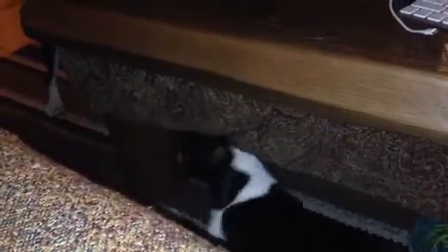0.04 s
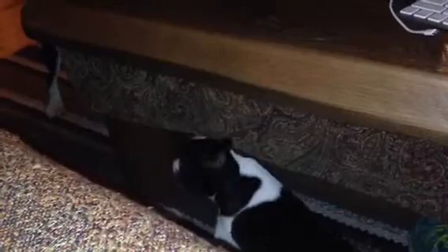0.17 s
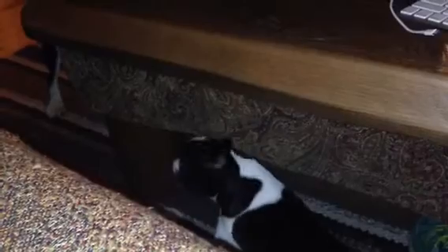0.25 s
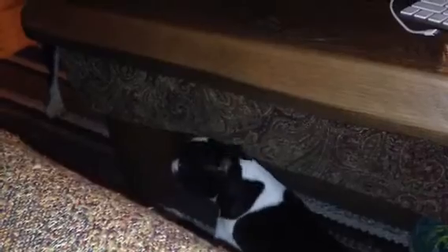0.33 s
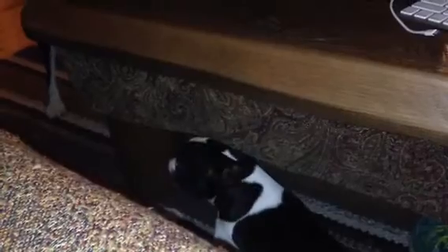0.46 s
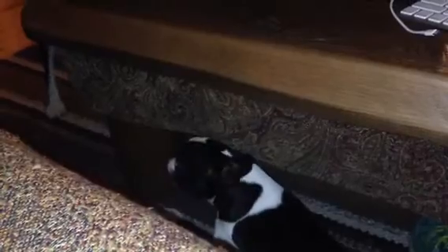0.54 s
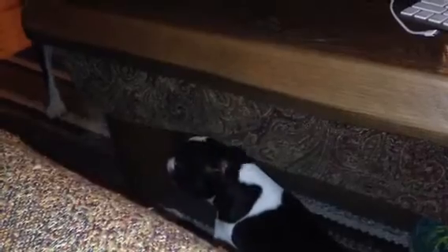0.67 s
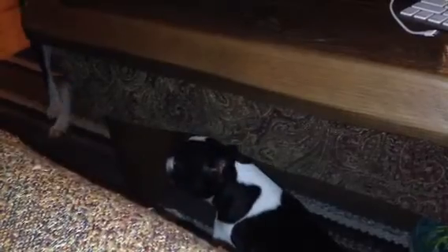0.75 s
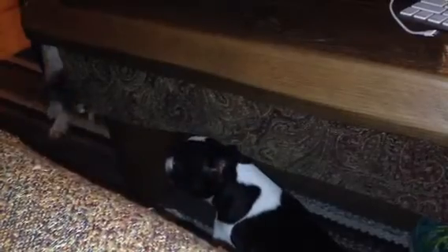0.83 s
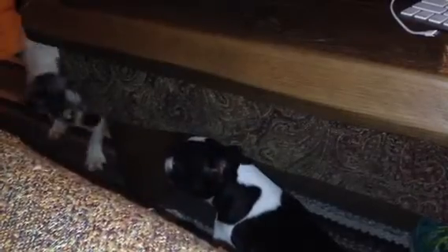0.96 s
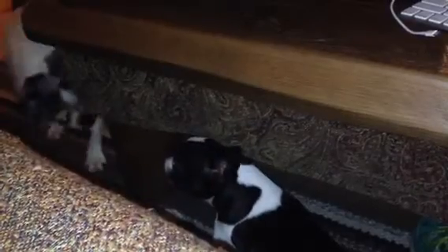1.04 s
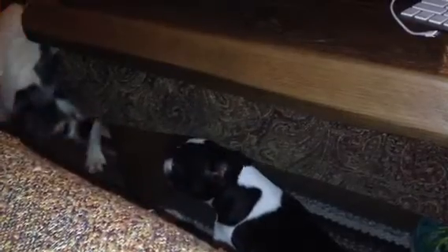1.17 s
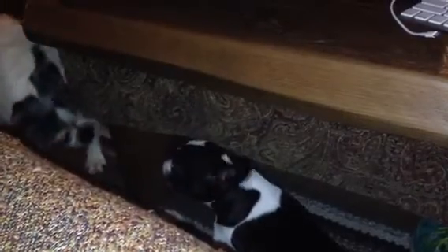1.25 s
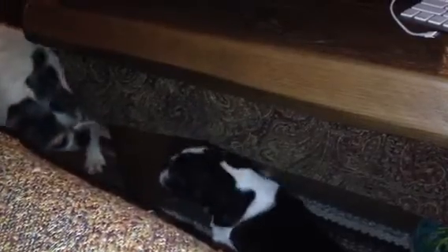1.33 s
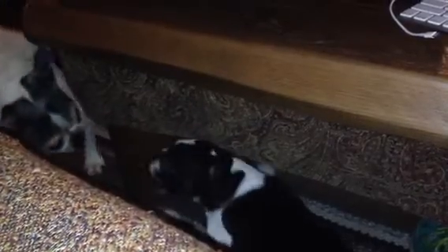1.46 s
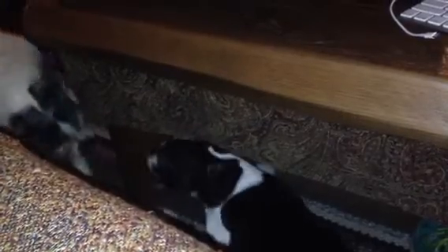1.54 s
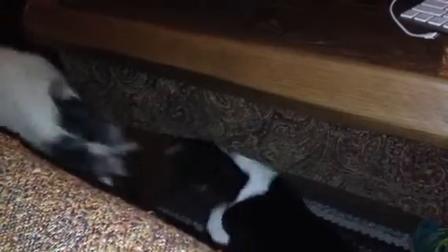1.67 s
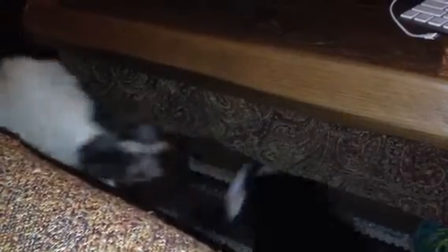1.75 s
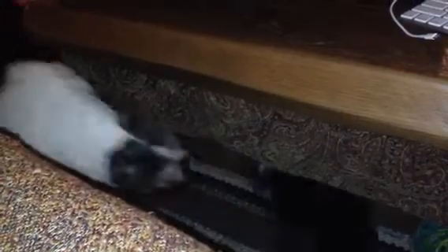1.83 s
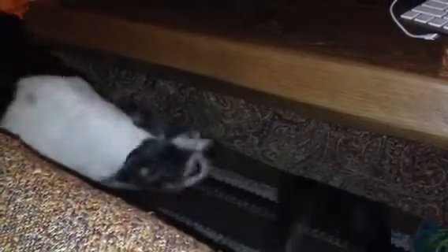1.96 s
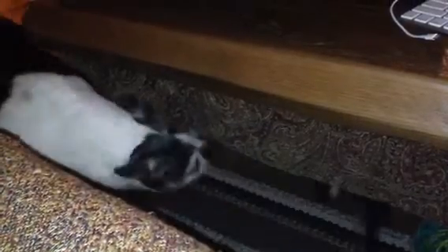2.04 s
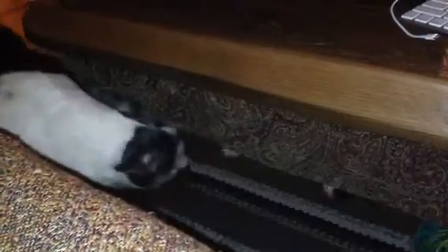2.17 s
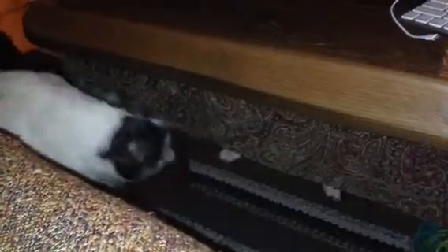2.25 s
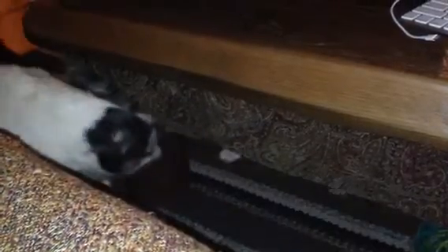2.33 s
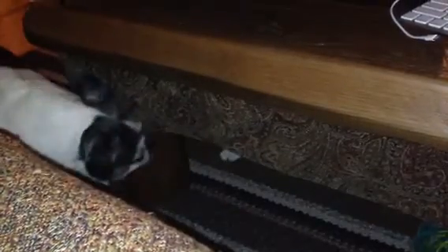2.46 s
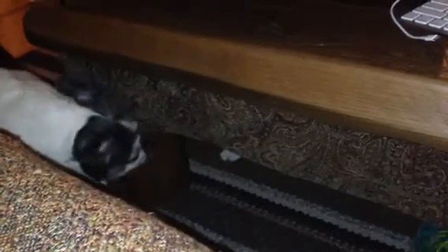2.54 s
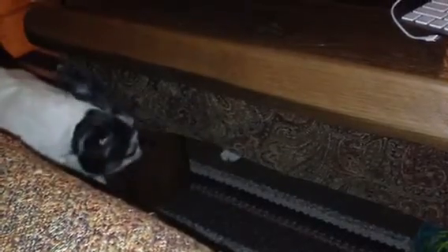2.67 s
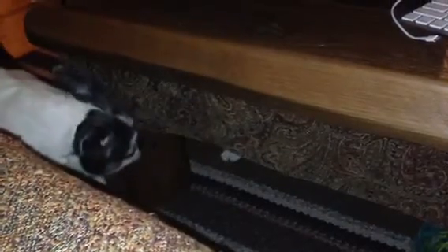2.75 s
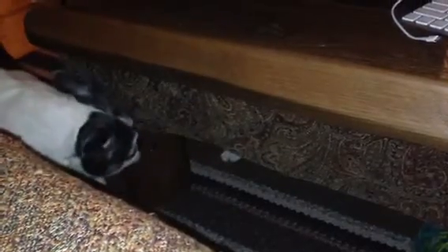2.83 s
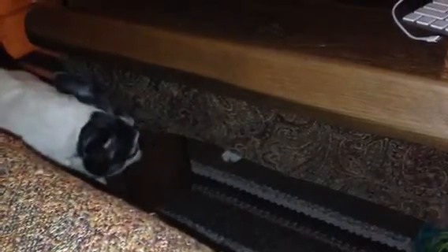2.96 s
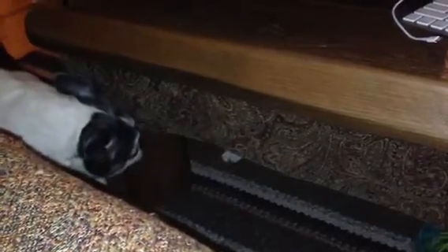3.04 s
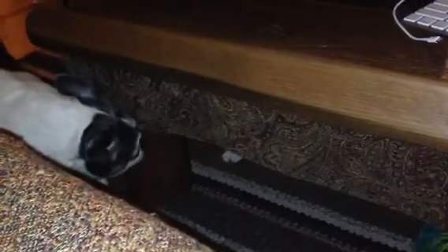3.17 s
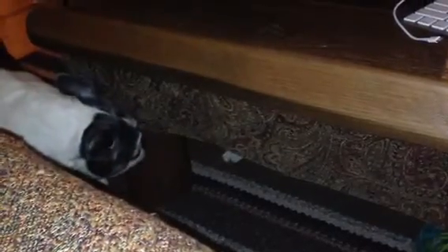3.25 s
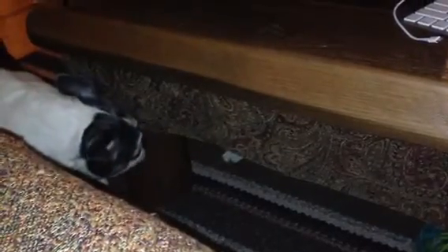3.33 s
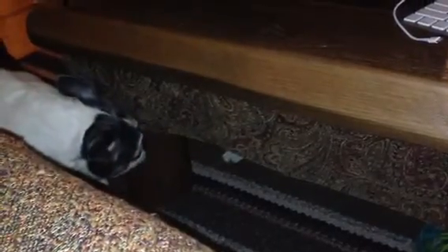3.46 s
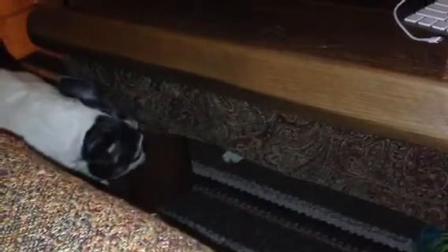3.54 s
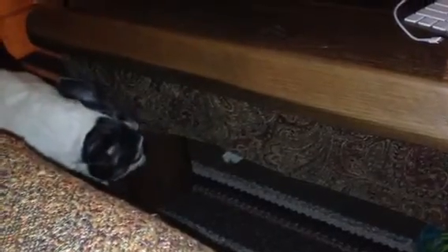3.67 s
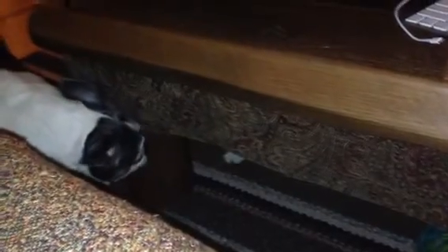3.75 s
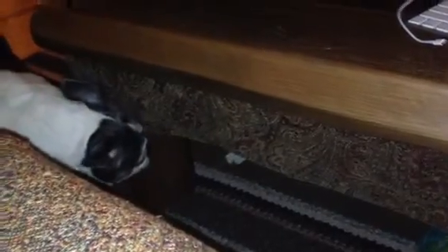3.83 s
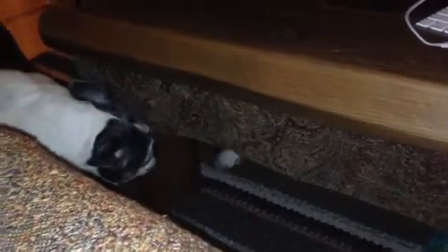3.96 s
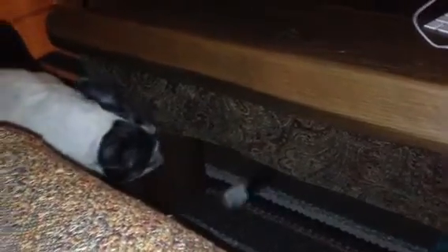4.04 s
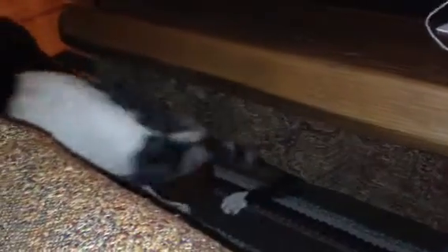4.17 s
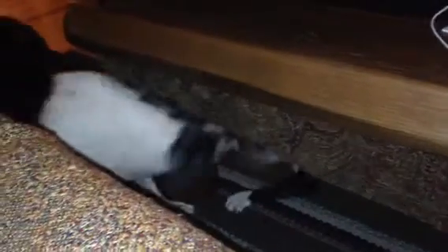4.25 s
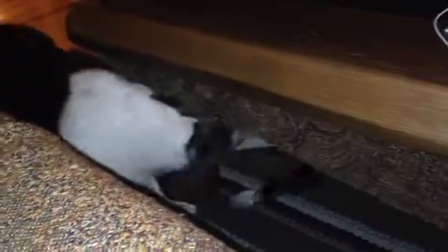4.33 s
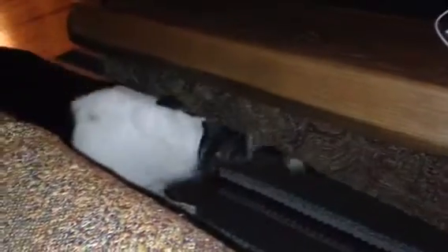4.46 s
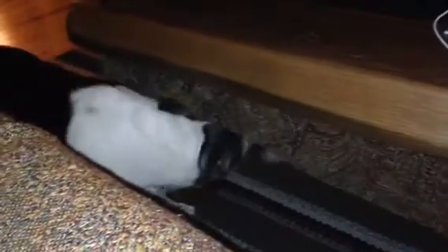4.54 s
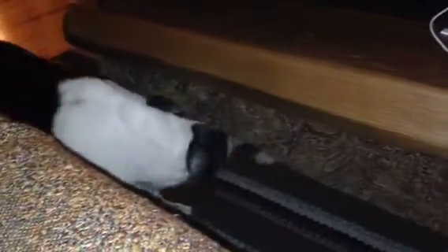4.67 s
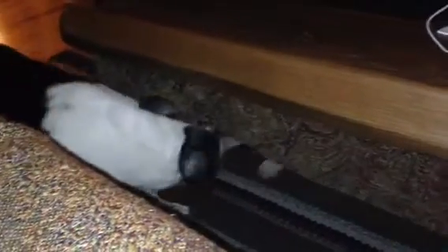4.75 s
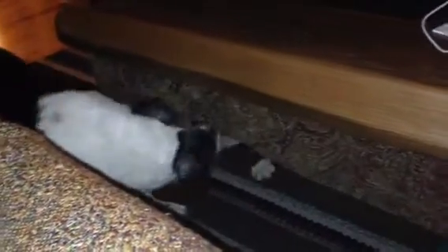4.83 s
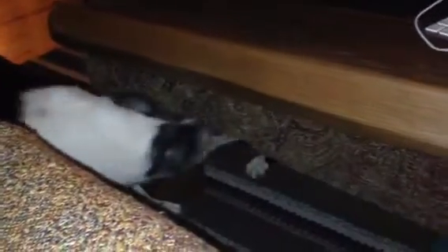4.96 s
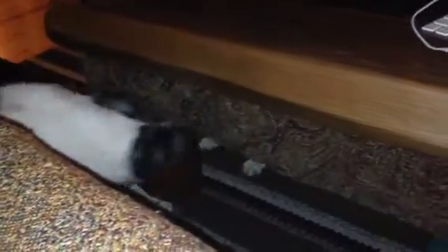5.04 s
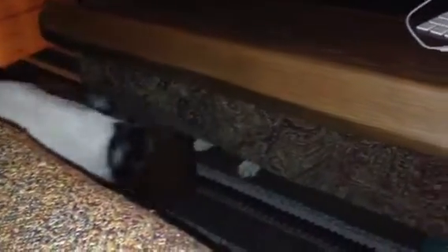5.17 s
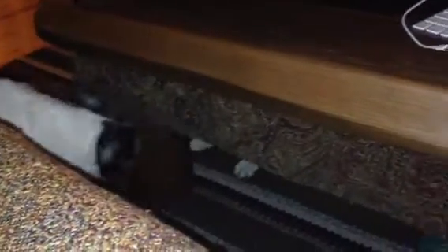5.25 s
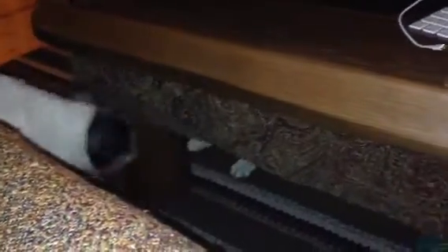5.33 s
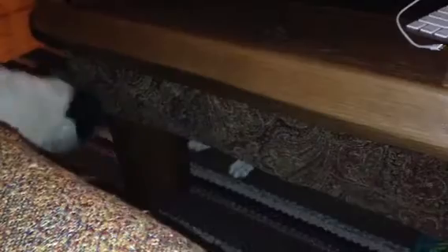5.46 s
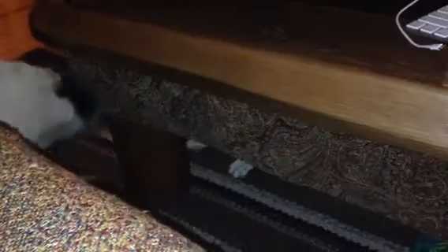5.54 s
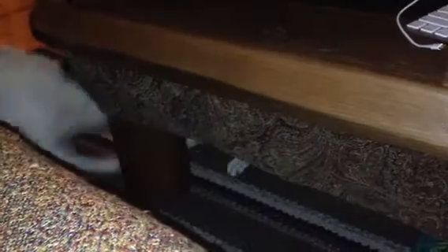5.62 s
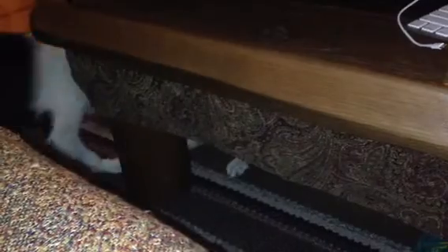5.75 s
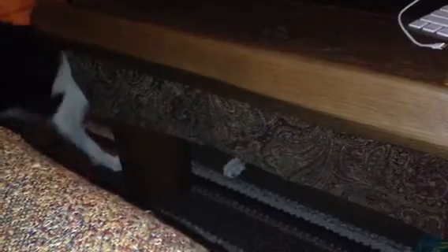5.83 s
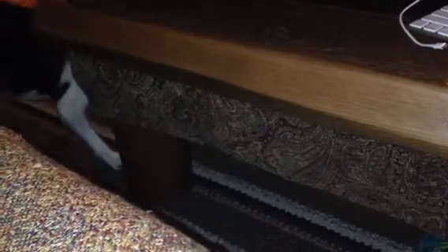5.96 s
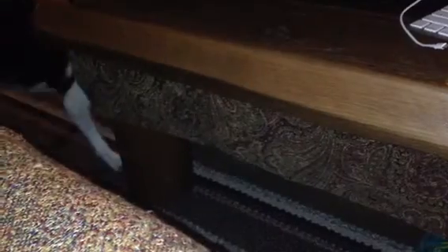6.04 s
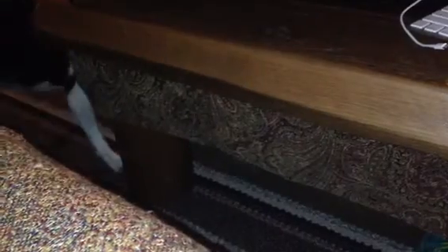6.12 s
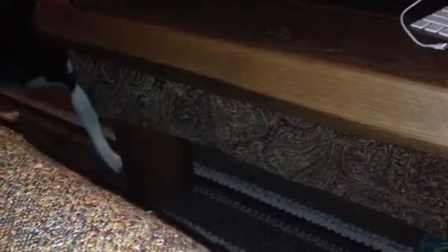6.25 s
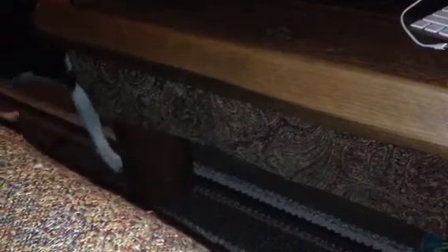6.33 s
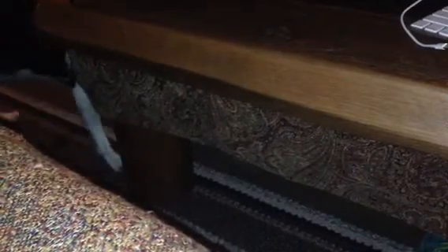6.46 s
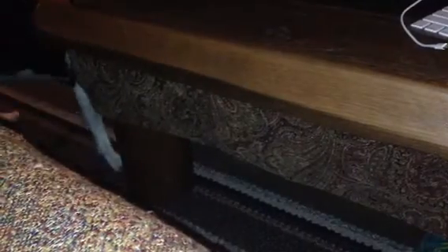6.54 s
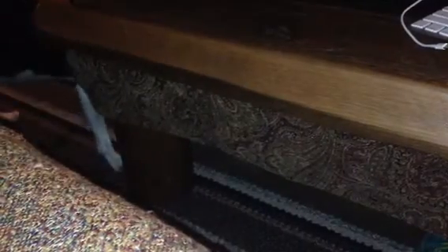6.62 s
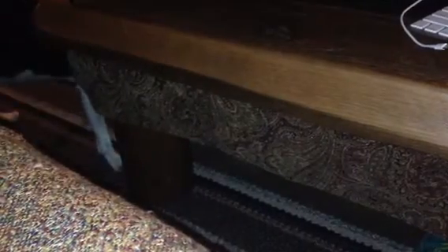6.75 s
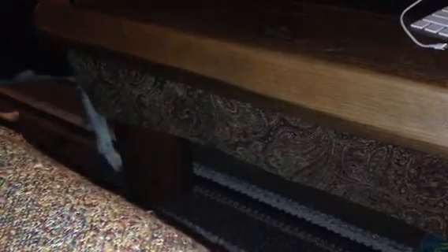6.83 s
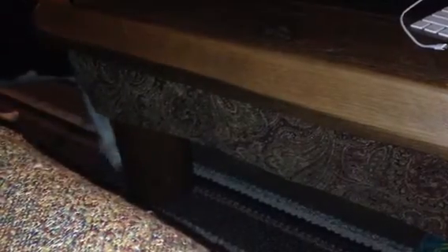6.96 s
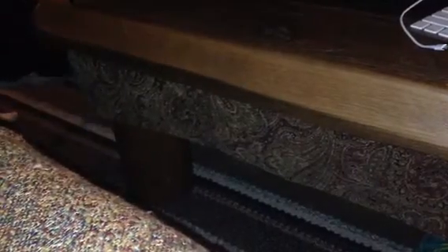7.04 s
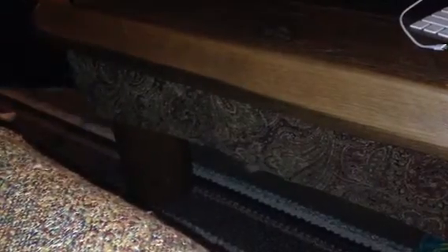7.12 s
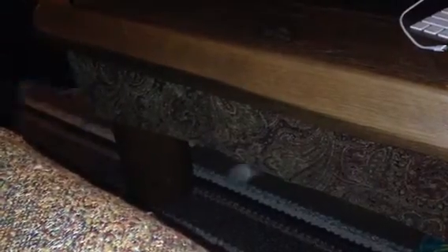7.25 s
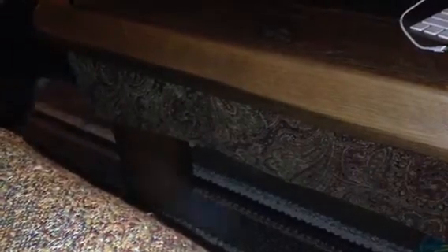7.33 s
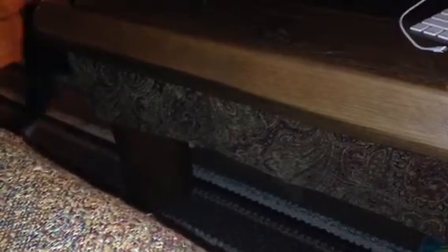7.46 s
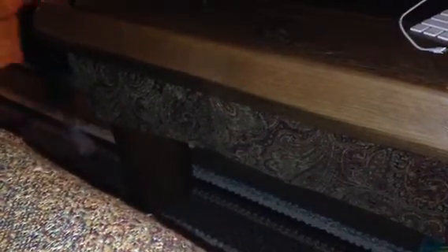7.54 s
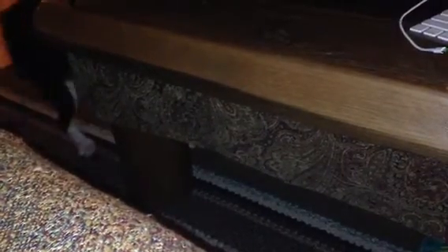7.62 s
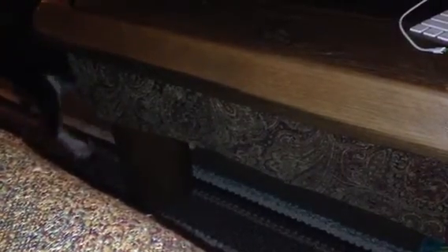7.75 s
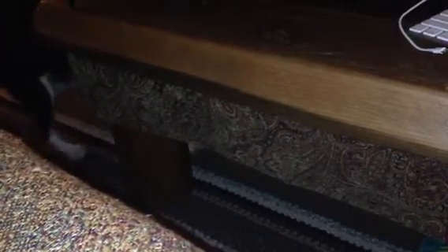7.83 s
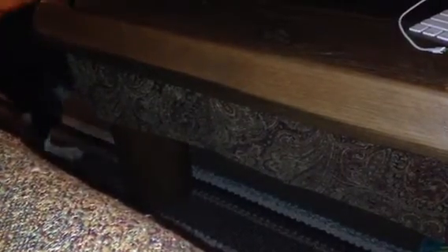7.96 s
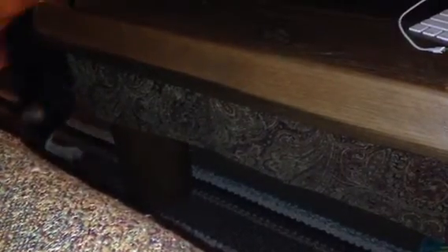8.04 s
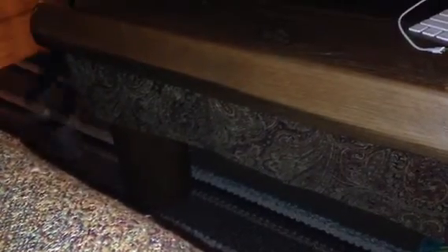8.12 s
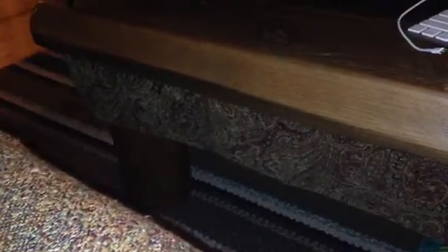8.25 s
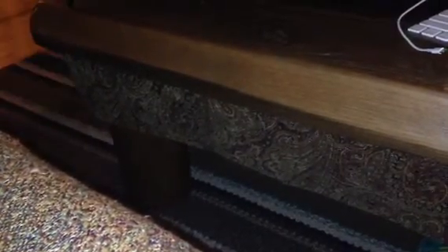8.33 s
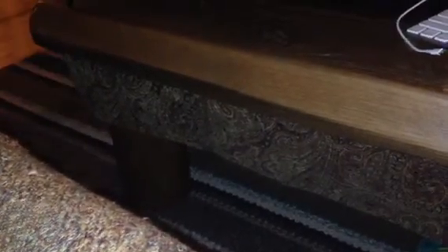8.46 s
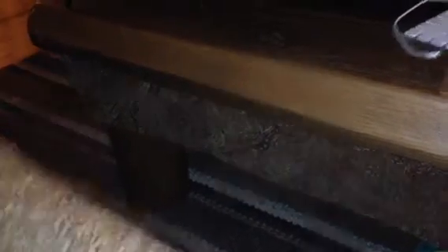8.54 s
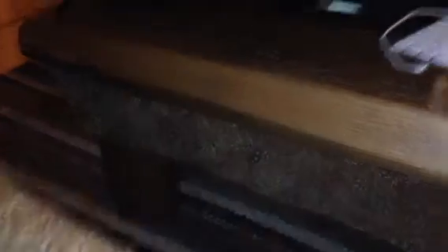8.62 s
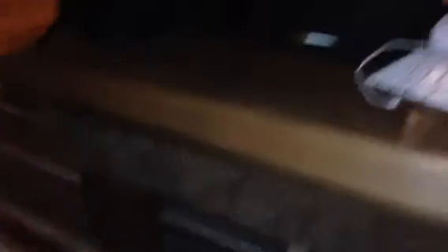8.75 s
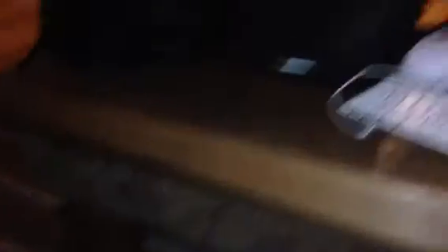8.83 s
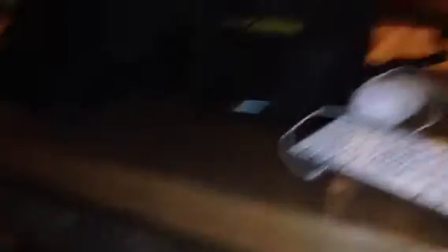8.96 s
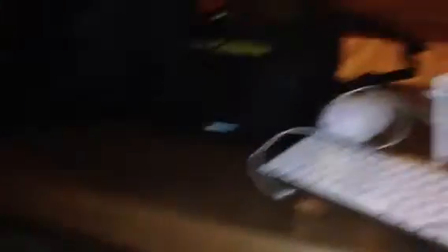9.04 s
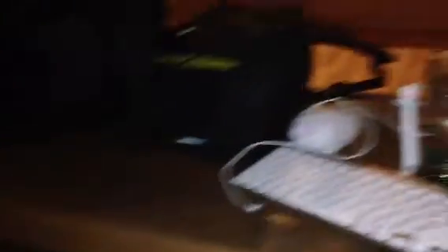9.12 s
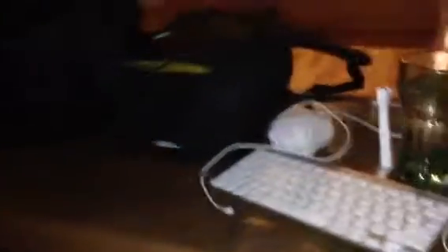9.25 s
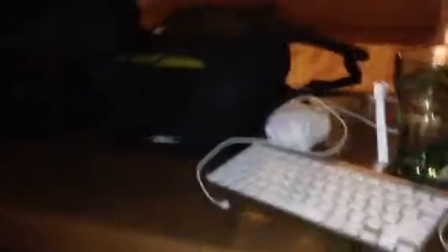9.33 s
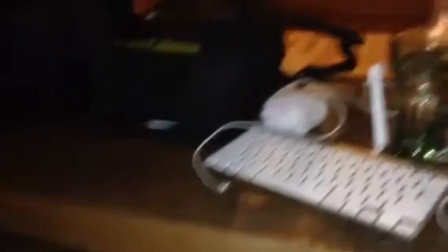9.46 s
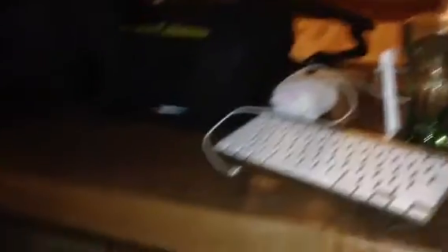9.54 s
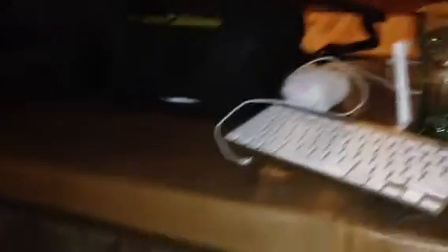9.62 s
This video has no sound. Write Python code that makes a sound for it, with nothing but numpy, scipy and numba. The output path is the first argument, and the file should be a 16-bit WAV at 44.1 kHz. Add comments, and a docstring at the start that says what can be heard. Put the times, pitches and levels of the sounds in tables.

```python
"""One small dog snarls in arches, most of which rise from a growl to a bark and sink back; another yaps sharply.
Each voice is a buzz of vocal-fold pulses and air, shaped by the chest, the moving jaw and the muzzle.
Shaped noise makes a snort, clicks of claws and teeth, knocking and thudding paws, rubbing fur and a soft growl.
The carpeted room adds echoes over a low rumble and faint hiss.
An automatic gain control turns everything down after loud barks and lets it creep back."""
import sys
import numpy as np
from scipy import signal
from scipy.fft import rfft, irfft, next_fast_len
from scipy.io import wavfile
from scipy.ndimage import uniform_filter1d, minimum_filter1d, map_coordinates
from numba import njit

SR = 44100
rng = np.random.default_rng(int(sys.argv[2]) if len(sys.argv) > 2 else 0)


def persist_wave(psi):
    """Save psi, clipped to +-1, as 16-bit WAV."""
    counts = np.round(np.clip(psi, -1, 1) * 32767).astype(np.int16)
    wavfile.write(sys.argv[1], SR, np.atleast_2d(counts).T)


N = 427329
TOP_HZ = 15600  # nothing sounds above this


def amp(db):
    """Turn decibels into a gain."""
    return 10 ** (np.asarray(db) / 20)


def unit(x):
    """Scale a sound to rms 1."""
    return x / np.sqrt(np.mean(x ** 2) + 1e-20)


def along(points, hz):
    """Read (frequency [Hz], value) points on a log frequency axis."""
    f, v = np.transpose(points)
    return np.interp(np.log(hz + 1), np.log(f + 1), v)


def curves(rows, t):
    """Read each column of a table at the times t, with straight lines between rows."""
    s, *columns = np.transpose(rows)
    return [np.interp(t, s, column) for column in columns]


def span(rows):
    """Give the sample times that a table covers, and a gate with soft edges."""
    edge = .004
    first = max(0, int((rows[0][0] - edge) * SR))
    last = int((rows[-1][0] + edge) * SR)
    t = np.arange(first, last) / SR
    to_edge = np.minimum(t - t[0], t[-1] - t)
    return t, np.sqrt(np.clip(to_edge / (2 * edge), 0, 1))


def add(track, s, x):
    """Mix x into the track at s seconds."""
    part = track[int(s * SR):][:len(x)]
    part += x[:len(part)]


def wobble(t, rate):
    """Draw a smooth random curve with this many random points a second."""
    knots = (t - t[0]) * rate
    return map_coordinates(rng.standard_normal(int(knots[-1]) + 4), [knots + 1])


def step(x):
    """Rise smoothly from 0 to 1 around x = 0."""
    return .5 + .5 * np.tanh(x)


def colour(x, spectrum):
    """Filter x to a (frequency [Hz], level [dB]) spectrum, with no sound ahead of its cause."""
    m = 2 * next_fast_len(len(x) // 2 + 4096)
    gain = amp(along(spectrum, np.fft.rfftfreq(m, 1 / SR)))
    # folding the cepstrum makes the filter causal (minimum phase)
    cepstrum = irfft(np.log(gain), m)
    cepstrum[1:m // 2] *= 2
    cepstrum[m // 2 + 1:] = 0
    return irfft(rfft(x, m) * np.exp(rfft(cepstrum)), m)[:len(x)]


def noise(t, spectrum):
    """Make coloured noise of rms 1."""
    return unit(colour(rng.standard_normal(len(t)), spectrum))


def steady(x):
    """Hold the slow level of x at rms 1."""
    power = uniform_filter1d(uniform_filter1d(x * x, size=700), size=700)
    return x / np.sqrt(np.abs(power) + 1e-14)


@njit
def resonate(x, hz, width, sr):
    """Ring like a hollow space whose pitch can move: a two-pole resonance."""
    y, r = np.zeros(len(x)), np.exp(-np.pi * width / sr)
    for i in range(2, len(x)):
        drive = (1 - r) * (x[i] - x[i - 2])
        y[i] = drive + 2 * r * np.cos(2 * np.pi * hz[i] / sr) * y[i - 1] - r * r * y[i - 2]
    return y


# how long the room rings in each pitch range: (frequency [Hz], time to fade by 60 dB [s])
ROOM_FADE = [(200, 0.44), (850, 0.64), (1200, 0.25805), (1600, 0.4513), (2400, 0.36), (4000, 0.4),
             (12000, 0.27)]


def room(x, early_db, tail_db):
    """Nearby furniture throws back quick copies; the walls add a short tail."""
    hz, t, grains = signal.stft(rng.standard_normal(SR // 2), SR, nperseg=256)
    fade = amp(-60 * t / along(ROOM_FADE, hz)[:, None])
    build_up = 1 - np.exp(-t / 0.0021)
    tail = signal.istft(grains * fade * build_up, SR, nperseg=256)[1]
    response = amp(tail_db) * tail / np.linalg.norm(tail)
    copies = (rng.uniform(.001, .018, size=14) * SR).astype(int)
    response[copies] += amp(early_db) * rng.choice([-1, 1], size=14)
    return x + signal.fftconvolve(x, response)[:N]


THROB_DB, THROB_PER_S = 4, 14  # size and rate of the rumble's quick chance swings
HISS_DB = -62  # level around which the hiss wavers
# slow loudness of the rumble, before its throb: (time [s], level [dB])
RUMBLE_LEVEL = [(0, -55.5), (.9, -46.5), (1.7, -47), (2.6, -44), (3.3, -45), (3.7, -44.5), (5.8, -45.5),
                (7.2, -42), (8.2, -44), (8.6, -42), (9.1, -42.5), (9.69, -37)]
# tone of the rumble: (frequency [Hz], relative level [dB])
RUMBLE_TONE = [(20, -32), (35, -23), (52, -18.5), (61, -4), (70, -4), (83, -5), (97, -11), (115, -12.5),
               (155, -22.5), (210, -32), (300, -34), (500, -89.5)]
# tone of the hiss: (frequency [Hz], relative level [dB])
HISS_TONE = [(110, -14), (200, -1), (330, -7.5), (450, -11), (1100, -14), (2200, -14.5), (3000, -18),
             (4000, -15), (7000, -23.5), (15500, -29.5)]


def background():
    """A throbbing low rumble and a faint, slightly uneven hiss, both of shaped noise."""
    t = np.arange(N) / SR
    rumble_db, = curves(RUMBLE_LEVEL, t)
    rumble = amp(rumble_db + THROB_DB * wobble(t, THROB_PER_S)) * noise(t, RUMBLE_TONE)
    hiss = amp(HISS_DB + 1.3 * wobble(t, 19)) * noise(t, HISS_TONE)
    return rumble + hiss


RUB_PEAK_SHARE = 0.24  # a stroke is strongest this far into its length
RUB_WIDTH_HZ = 1400  # width of the scuff's resonance
# rubbing fur and feet; the first stroke is the snort's breathy tail,
# and the one at 2.091 s is a short, soft growl, likely the other dog's:
# (time [s], length [s], scuff level [dB], scuff resonance [Hz], swish level [dB])
SOFT_STROKES = [(0.481, 0.29, -54, 1438, -59.5), (1.303, 0.08543, -52, 1391, -65),
                (1.37, 0.28402, -56.5, 1213, -51.5), (1.692, 0.11624, -41, 1318, -59.5),
                (2.091, .07, -35, 2101, -58.5), (2.358, 0.39, -50.5, 1250, -57),
                (2.549, 0.22, -44.5, 1842, -64.5), (6.383, 0.21, -59.5, 1096, -64),
                (6.92, .05, -46, 2349, -60.5), (8.468, 0.13, -49, 1579, -54.5),
                (8.618, 0.2, -49, 1791, -60), (8.86, 0.13, -60, 1400, -58), (9.07, 0.2, -52, 2100, -60),
                (9.431, 0.15915, -51, 1800, -53.5)]
# tone of a dull scuff, also heard under the paws: (frequency [Hz], relative level [dB])
SCUFF = [(250, -10.5), (550, -7), (800, -1), (1350, -5.5), (1800, -7.5), (2400, -6), (2900, -9.5),
         (3800, -10.5), (6000, -22.5)]
# tone of a bright swish, also the treble of the short knocks: (frequency [Hz], relative level [dB])
SWISH = [(2000, -22.5), (4300, 2), (5400, 3.5), (7300, -1.5), (8500, -3), (11000, -12.5), (13500, -11),
         (15500, -13.5)]


def soft_strokes():
    """Rubbing fur and feet, a breathy snort tail and a soft growl: uneven, grainy strokes of noise."""
    out = np.zeros(N)
    for s, length, scuff_db, scuff_hz, swish_db in SOFT_STROKES:
        t = np.arange(int(length * SR)) / SR
        stroke = np.interp(t / length, [0, RUB_PEAK_SHARE, 1], [0, 1, 0]) ** 2.1
        # in the rubs, fibres catch and slip
        grain = unit(amp(1.6 * wobble(t, 70) + 2.2 * wobble(t, 410)))
        centre_hz = np.full(len(t), float(scuff_hz))
        scuff = unit(resonate(grain * noise(t, SCUFF), centre_hz, RUB_WIDTH_HZ, SR))
        add(out, s, stroke * (amp(scuff_db) * scuff + amp(swish_db) * noise(t, SWISH)))
    return out


# paws landing, levels before a trim:
# (time [s], level [dB], scuff level against the thud [dB], time to fade by 60 dB [s])
PAWS = [(1.698, -37, 2, 0.1383), (2.459, -45.5, -11, 0.2114), (8.383, -38.5, -2, 0.085),
        (8.616, -23, -21, 0.10388), (8.723, -36.5, -19.5, 0.077), (8.872, -43.5, -1.5, 0.085)]
# tone of the thud: (frequency [Hz], relative level [dB])
PAW_TONE = [(59, -27), (100, -13.5), (172, 9), (329, 7.5), (517, -1.5), (634, -15.5), (1020, -8.5),
            (1220, -37), (1500, -42), (1950, -69.5), (3300, -120)]


def paws():
    """Paws thud: a quick push of low noise with some scuff, dying away."""
    out, t = np.zeros(N), np.arange(SR // 5) / SR
    for s, db, scuff_db, decay in PAWS:
        push = (1 - np.exp(-t / 0.00091)) * amp(db - 5.5 - 60 * t / decay)
        add(out, s, push * (noise(t, PAW_TONE) + amp(scuff_db + 1.0) * noise(t, SCUFF)))
    return out


# claws, teeth, dull paw knocks (1.249 and 1.38 s) and the snort's sharp onset (0.309 s),
# levels before a trim:
# (time [s], level [dB], treble level against the body [dB], time to fade by 60 dB [s])
SHORT_KNOCKS = [(0.309, -44, -18, 0.0343), (0.595, -37, -9, 0.02098), (1.249, -42, -26.5, 0.07916),
                (1.38, -37, -18, 0.0761), (1.405, -43.5, -11, 0.049), (1.462, -41.5, -6, 0.0249),
                (1.494, -46.5, -7.5, 0.04805), (1.789, -16, -20, 0.01304), (2.363, -38, -29, 0.048),
                (2.526, -35.5, -21.5, 0.03617), (2.62, -44.5, -26.5, 0.0432), (2.684, -37.5, -15, 0.0398)]
# tone of the body of these sounds: (frequency [Hz], relative level [dB])
KNOCK_TONE = [(240, -56.5), (400, -15.5), (673, -14.5), (1420, 0.5), (2350, -5), (3070, -36.5),
              (3510, -16.5), (5570, -34.5), (6560, -18.5), (14000, -54.5)]


def short_knocks():
    """Claws, teeth, dull paw knocks and the snort's onset: noise that starts at once and dies quickly."""
    out, t = np.zeros(N), np.arange(SR // 5) / SR
    for s, db, treble_db, decay in SHORT_KNOCKS:
        fade = amp(db - 4.5 - 60 * t / decay)
        add(out, s, fade * (noise(t, KNOCK_TONE) + amp(treble_db + 2.5) * noise(t, SWISH)))
    return out


# course of the snort, levels before a trim:
# (time [s], flutter level [dB], air level [dB], nose resonance [Hz])
SNORT = [(0.324, -35, -68.5, 520), (0.345, -37.5, -44.5, 600), (0.372, -29, -39.5, 849),
         (0.394, -39.5, -26, 1346), (0.418, -33, -35, 1942), (0.44, -47, -32, 1779),
         (0.465, -51, -40.5, 1312), (0.5, -75.5, -54.5, 1203)]
# tone of the lip flutter: (frequency [Hz], relative level [dB])
SNORT_LOW = [(80, -12.5), (140, 3), (240, -9.5), (340, -2.5), (440, -18), (600, -4.5), (800, -28.5),
             (1200, -22.5), (2200, -61.5)]
# tone of the air before the nose: (frequency [Hz], relative level [dB])
SNORT_AIR = [(300, -3.5), (600, 6), (950, 9), (1400, -5), (1800, -5.5), (2450, -1.5), (2700, -15.5),
             (3600, -9), (7000, -3), (12500, -6), (15000, -22)]


def snort():
    """A dog huffs: its lips flutter, then air bursts through a nose resonance that rises and sinks."""
    t, gate = span(SNORT)
    flutter_db, air_db, nose_hz = curves(SNORT, t)
    air = steady(resonate(noise(t, SNORT_AIR), nose_hz, 765.2, SR))
    flutter = steady(noise(t, SNORT_LOW))
    huff = amp(flutter_db - 1.5) * flutter + amp(air_db - 5.0) * air
    roughness = unit(amp(1.934 * wobble(t, 262.5)))
    out = np.zeros(N)
    add(out, t[0], gate * huff * roughness)
    return out


def larynx(t, pitch, rough, jitter, shimmer_db):
    """Pulses of the vocal folds, unsteady when rough, and the air that each opening lets through."""
    # slack folds at growl pitch keep time less well
    slack = np.sqrt(500 / pitch)
    quaver = .022 * slack * wobble(t, 70) + jitter * slack * (.15 + rough) * wobble(t, 330)
    phase = 2 * np.pi * np.cumsum(pitch * (1 + quaver)) / SR
    k = np.arange(1, 48)[:, None]  # harmonic numbers
    # the folds close gradually, which spreads each pulse
    harmonics = np.cos(k * phase + .3 * k ** 2) * (k * pitch < TOP_HZ)
    pulses = unit(np.sum(harmonics, axis=0))
    # strained folds slip in and out of patterns of two and three cycles
    halves, thirds = np.cos(phase / 2), np.cos(phase / 3 + wobble(t, 40))
    pattern = 1 + rough * (1.3 * wobble(t, 45) * halves + 1.2 * wobble(t, 45) * thirds)
    air = unit(rng.standard_normal(len(t)) * (1 + 0.96 * np.cos(phase)))
    rattle = amp(shimmer_db * rough * slack * wobble(t, 190))
    return steady(pulses * pattern) * rattle, air * rattle


JAW_WANDER, JAW_WANDER_PER_S = 0.051, 38  # chance movement of the resonances: share, rate
PART_FLUTTER_DB, PART_FLUTTER_PER_S = 1.8426, 110  # wavering of second resonance and rasp, each its own
# range of the first resonance, alike in both dogs: (frequency [Hz], relative level [dB])
MOUTH = [(400, -72), (650, -21.5), (800, -3), (1000, 0), (1480, -0.5), (1700, 0), (2100, -19),
         (3200, -58.5)]
# range of the second resonance, alike in both dogs: (frequency [Hz], relative level [dB])
SECOND = [(1200, -55.5), (1650, 4), (1900, 3.5), (2150, -2.5), (2400, 1.5), (2650, -4.5), (2950, -14),
          (3800, -49.5)]


def dog(calls, chest_tone, rasp_tone, jitter, shimmer_db, first_width_hz, second_width_hz,
        third_width_hz, chest_air, rasp_air, mouth_db, chest_db, second_db, rasp_db):
    """Pulses and air sound through the chest and three mouth resonances; the chest carries least air."""
    out = np.zeros(N)
    for t, gate, pitch, rough, resonances, (first, second, rasp, chest) in calls:
        first_hz, second_hz, third_hz = [
            hz * (1 + JAW_WANDER * wobble(t, JAW_WANDER_PER_S)) for hz in resonances]
        rough = np.clip(rough, .01, .95)
        pulses, air = larynx(t, pitch, rough, jitter, shimmer_db)

        def source(airiness):
            """Mix pulses and air: the rougher the voice, the more air."""
            return np.sqrt(1 - rough) * pulses + airiness * np.sqrt(rough) * air

        def flutter():
            """Waver in level [dB]."""
            return PART_FLUTTER_DB * wobble(t, PART_FLUTTER_PER_S)

        chest_part = steady(colour(source(chest_air), chest_tone))
        first_part = steady(colour(resonate(source(1.0), first_hz, first_width_hz, SR), MOUTH))
        second_part = steady(colour(resonate(source(1.0), second_hz, second_width_hz, SR), SECOND))
        # the third resonance is only a bump on the muzzle's broad rasp
        breath = source(rasp_air)
        muzzle = breath + 1.9 * resonate(breath, third_hz, third_width_hz, SR)
        rasp_part = steady(colour(muzzle, rasp_tone))

        voice = amp(chest + chest_db) * chest_part
        voice += amp(first + mouth_db) * first_part
        voice += amp(second + second_db + flutter()) * second_part
        voice += amp(rasp + rasp_db + flutter()) * rasp_part
        add(out, t[0], gate * voice)
    return out


# depth of the attack; speed and length of the release
YAP_RISE_DB, YAP_RELEASE_DB_PER_S, YAP_RELEASE_S = 32, 298.5, 0.069
YAP_REST_SHARE, YAP_CREST_S = .73, .027  # pitch far from the crest over crest pitch; crest half width
YAP_TEAR, YAP_TEAR_S = 0.33894, 0.0046  # roughness gained as the voice breaks; how quickly
# the jaw's closed resonance; it closes this long after the crest, and this quickly
JAW_SHUT_HZ, JAW_LAG_S, JAW_CLOSE_S = 993.3, .032, 0.034
YAP_CHEST_SAG_DB_PER_S = 110  # the chest fades through the hold


def yap(start, attack, hold, crest, crest_hz, clear_rough, open_hz, first_db, sag,
        second_hz, second_db, third_hz, rasp_db, chest_db):
    """Attack, hold, release: the pitch flicks up, then the voice tears and the jaw closes."""
    age = np.arange(int((attack + hold + YAP_RELEASE_S) * SR)) / SR
    held, past_crest = np.maximum(0, age - attack), age - crest
    attack_db = -YAP_RISE_DB * np.maximum(0, 1 - age / attack)
    release_db = -YAP_RELEASE_DB_PER_S * np.maximum(0, held - hold)
    gate = amp(attack_db + release_db)
    flick = np.exp(-(past_crest / YAP_CREST_S) ** 2)
    pitch = crest_hz * (YAP_REST_SHARE + (1 - YAP_REST_SHARE) * flick)
    rough = clear_rough + YAP_TEAR * step(past_crest / YAP_TEAR_S - 1)
    jaw_hz = open_hz + (JAW_SHUT_HZ - open_hz) * step((past_crest - JAW_LAG_S) / JAW_CLOSE_S)
    spent = np.minimum(held, hold)
    levels = first_db - sag * spent, second_db, rasp_db, chest_db - YAP_CHEST_SAG_DB_PER_S * spent
    return start + age, gate, pitch, rough, (jaw_hz, second_hz, third_hz), levels


# one yap a row, levels before a trim: (time [s], attack [s], hold [s], start to pitch crest [s],
# crest pitch [Hz], roughness before the tear [0-1], first resonance with open jaw [Hz],
# its level [dB], its sag [dB/s], second resonance [Hz], its level [dB], muzzle resonance [Hz],
# rasp level [dB], chest level [dB])
YAPS = [ (4.02, .011, 0.047, .021, 729.4, .1, 1435, 5, 157.5, 2077, -9, 4722, -8.5, -25.5),
        (4.251, 0.025, 0.044, .029, 661.6, .35, 1330, -5, 53, 2447, -7.5, 4223, -13, -31.5),
        (4.686, 0.09201, 0.022, 0.087, 727.7, .2, 1560, 0, 64.5, 2396, -13, 3753, -13, -28),
        (5.245, 0.017, 0.031, .021, 710.2, 0.5, 1480, 2.5, 170.5, 2031, -6.5, 4166, -11, -36),
        (7.072, 0.008, 0.066854, .052, 624.7, 0.4, 1260, 1, 31, 2328, -7.5, 3900, -16.5, -17.5),
        (7.554, 0.021, 0.06056, .042, 753.9, 0.2, 1360, -4.5, -5.5, 2387, -7.5, 4412, -16.5, -22),
        (9.184, 0.03, 0.07481, .074, 372.2, .25, 1100, -12.5, -3.5, 2272, -19, 4137, -24, -24.5)]
# low resonance of the yapping dog's chest: (frequency [Hz], relative level [dB])
YAP_CHEST = [(110, -28), (190, -7.5), (300, -20), (420, -25), (560, -13.5), (720, -1), (830, 6.5),
             (1000, -20.5), (1400, -60.5)]
# upper resonances of its muzzle: (frequency [Hz], relative level [dB])
YAP_RASP = [(1900, -31), (2900, -1.5), (3400, 0), (4000, -5.5), (4800, -0.5), (5500, -7), (6200, -8),
            (7200, -14.5), (8500, -19), (10000, -26.5), (11500, -31.5), (15500, -35)]


def yapping():
    """The yapping dog: a throat that keeps fairly even time, with an airy chest."""
    return dog([yap(*row) for row in YAPS], YAP_CHEST, YAP_RASP, jitter=.028, shimmer_db=3.5,
               first_width_hz=213.37, second_width_hz=120, third_width_hz=240,
               chest_air=0.48, rasp_air=0.98,
               mouth_db=-4.0, chest_db=1, second_db=-1.5, rasp_db=-1.5)


GROWL_HZ, GROWL_ROUGH = 208.09, .33  # the slack voice far from the crest of an arch
ARCH_POWER = 3.6  # higher = flatter top, steeper flanks
# the first resonance sinks from this share above to this share below; the muzzle's resonance
SNARL_JAW_SWING, SNARL_THIRD_HZ = 0.086, 3526
# the voice lasts up to this many rise and fall times, and fades at both ends
ARCH_BEFORE, ARCH_AFTER, ARCH_FADE_S = 1.8, 2.3766, .025
# how each part grows with pitch; rows are first resonance, second resonance, rasp, chest:
# (growth [dB per octave], lead over the pitch [s])
SNARL_GROWTH = [(22, 0.0021), (18, .022), (16.5, 0.0093), (3.5, .012)]


def snarl(t, crest, rise, fall, crest_hz, crest_rough, first_hz, first_db,
          second_hz, second_db, rasp_db, chest_db):
    """Effort moves a growl to its crest and back; the voice gets louder as the pitch climbs."""
    to_end = np.minimum(t - t[0], t[-1] - t)
    gate = np.sin(np.pi / 2 * np.clip(to_end / ARCH_FADE_S, 0, 1))

    def place(s):
        """Distance from the crest, in rise or fall times."""
        return (s - crest) / np.where(s < crest, rise, fall)

    def effort(s):
        """Strain of the voice: 1 at the crest, towards 0 far away."""
        return 1 / (1 + np.abs(place(s)) ** ARCH_POWER)

    def pitch(s):
        """Strain tightens or slackens the folds towards the crest pitch."""
        return GROWL_HZ + (crest_hz - GROWL_HZ) * effort(s)

    rough = GROWL_ROUGH + (crest_rough - GROWL_ROUGH) * effort(t)
    crest_levels = first_db, second_db, rasp_db, chest_db
    levels = [db + per_octave * np.log2(pitch(t + lead) / crest_hz)
              for db, (per_octave, lead) in zip(crest_levels, SNARL_GROWTH)]
    jaw_hz = first_hz * (1 - SNARL_JAW_SWING * np.tanh(place(t)))
    return t, gate, pitch(t), rough, (jaw_hz, second_hz, SNARL_THIRD_HZ), levels


# one arch of effort a row, levels before a trim: (crest time [s], rise [s], fall [s],
# crest pitch [Hz], crest roughness [0-1], first resonance [Hz], its level [dB],
# second resonance [Hz], its level [dB], rasp level [dB], chest level [dB])
SNARLS = [ (1.984, .063, .043, 615.1, .1, 1220, 3, 2222, -9.5, -15.5, -27),
          (4.004, 0.016, 0.029, 247.3, .5, 1012, -50, 2200, -59.5, -71.5, -42),
          (4.478, .066, 0.043, 619.7, .07, 1170, -2.5, 2350, -12, -22.5, -30),
          (4.962, .068, 0.045, 652.2, .12, 1203, -2, 2205, -11, -18.5, -27.5),
          (5.482, .062, 0.053, 576.4, .2, 1230, -6.5, 2058, -15.5, -27.5, -27.5),
          (5.660, .034, .020, 366.9, 0.4, 1239, -11.5, 2139, -18.5, -28.5, -32.5),
          (5.716, .055, .047, 554.4, .35, 1163, -10, 2210, -19.5, -28, -33),
          (5.81, 0.038, .05, 244.4, 0.16, 1320, -26, 2369, -32, -40, -33),
          (5.951, .044, 0.035, 383.7, .15, 1380, -17, 2356, -21.5, -31, -36),
          (7.275, .030, .030, 181.7, 0.49, 1250, -26, 1900, -36, -42, -32),
          (7.405, .042, .049, 626.5, .05, 1250, 2, 2367, -6, -18.5, -25),
          (7.905, .025, .035, 203.3, 0.64, 900, -44.5, 2400, -65, -72.5, -37),
          (8.035, .052, .075, 293.7, 0.17, 1272, -29.5, 2363, -35.5, -42, -33),
          (8.210, .068, .050, 602.9, .5, 1302, -12.5, 2562, -21, -27.5, -35.5),
          (8.290, .030, 0.037, 305.5, .4, 1500, -21.5, 2168, -20.5, -32, -32)]
# low resonance of the snarling dog's chest: (frequency [Hz], relative level [dB])
SNARL_CHEST = [(90, -29.5), (170, 8), (290, -1), (420, -11.5), (600, -3), (750, -5.5), (950, -41),
               (1400, -72.5)]
# upper resonances of its muzzle: (frequency [Hz], relative level [dB])
SNARL_RASP = [(1900, -37.5), (2800, -13.5), (3150, -2.5), (3600, -4.5), (4100, -8.5), (4800, -13),
              (6000, -14.5), (6700, -17), (7800, -19), (10000, -25.5), (12000, -33), (15500, -36)]


def snarling():
    """One throat plays all the arches: where two come close, the first hands over to the second."""
    crest, rise, fall = np.transpose(SNARLS)[:3]
    # the handover splits each gap in proportion to the fall and the next rise
    dips = crest[:-1] + np.diff(crest) * fall[:-1] / (fall[:-1] + rise[1:])
    starts = np.maximum(crest - ARCH_BEFORE * rise, np.append(0, dips - ARCH_FADE_S / 2))
    ends = np.minimum(crest + ARCH_AFTER * fall, np.append(dips + ARCH_FADE_S / 2, N / SR))
    arches = [snarl(np.arange(int(a * SR), int(b * SR)) / SR, *row)
              for a, b, row in zip(starts, ends, SNARLS)]
    return dog(arches, SNARL_CHEST, SNARL_RASP, jitter=0.05, shimmer_db=7.0,
               first_width_hz=151.11, second_width_hz=380, third_width_hz=600,
               chest_air=0.04, rasp_air=1.7,
               mouth_db=-4.5, chest_db=-3.5, second_db=-2.5, rasp_db=-3.5)


def scene():
    """Both dogs and their small noises, each with its own share of echo, over the background."""
    small_noises = soft_strokes() + paws() + short_knocks() + snort()
    sound = background()
    sound += room(small_noises, early_db=-20.5, tail_db=-11)
    sound += room(yapping(), early_db=-18.5, tail_db=-13.0)
    sound += room(snarling(), early_db=-15.5, tail_db=-10.5)
    return sound[None]


GAIN_THRESHOLD_DB, GAIN_RECOVERY_DB_PER_S = -10, 10.5  # the automatic gain control


def record(dry):
    """Gain control ducks at loud barks and creeps back; a limiter holds peaks; the top band is cut."""
    level_db = 10 * np.log10(np.abs(uniform_filter1d(dry ** 2, size=880)) + 1e-12)
    recovered = GAIN_RECOVERY_DB_PER_S * np.arange(N) / SR
    excess_db = np.maximum(0, level_db - GAIN_THRESHOLD_DB)
    # the strongest duck so far, each sinking at the recovery speed
    duck_db = np.maximum.accumulate(excess_db + recovered, axis=-1) - recovered
    ducked = dry * amp(-duck_db)
    ceiling = .7
    gain = np.minimum(1, ceiling / (np.abs(ducked) + 1e-9))
    held = ducked * uniform_filter1d(minimum_filter1d(gain, size=130), size=130)
    m = next_fast_len(N + 4096)
    passed = np.fft.rfftfreq(m, 1 / SR) < TOP_HZ
    return irfft(rfft(held, m) * passed, m)[..., :N]


dry = scene()
out = record(dry)
persist_wave(out)
```